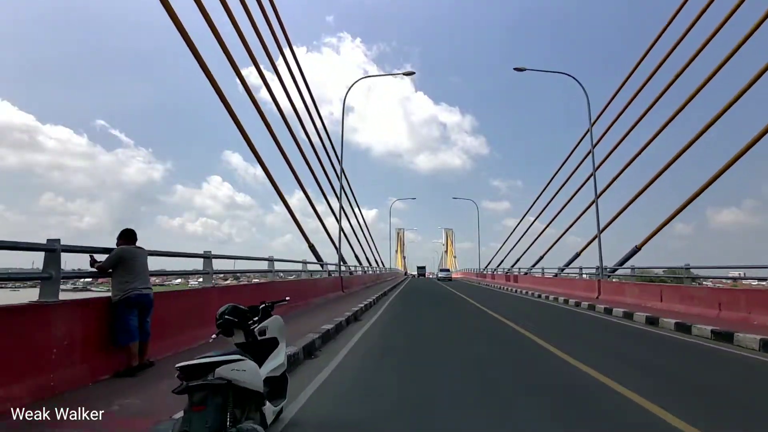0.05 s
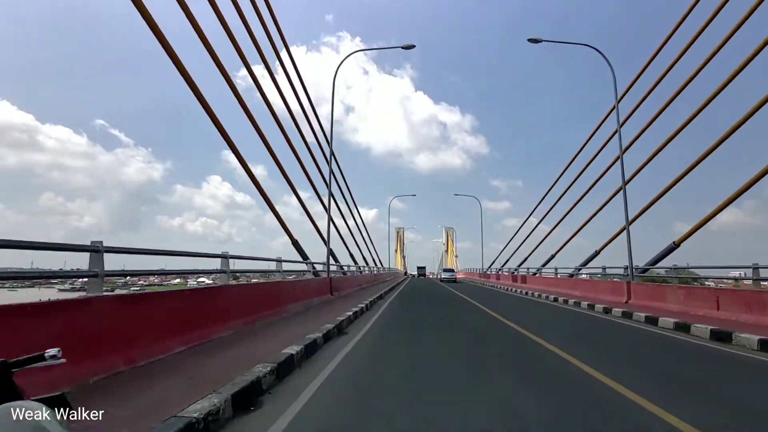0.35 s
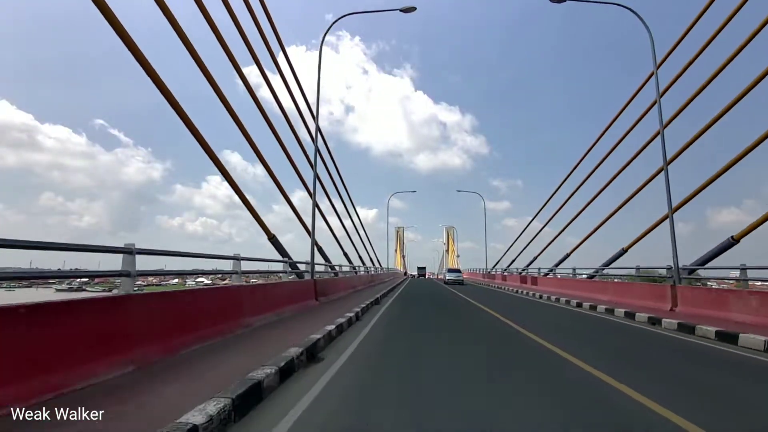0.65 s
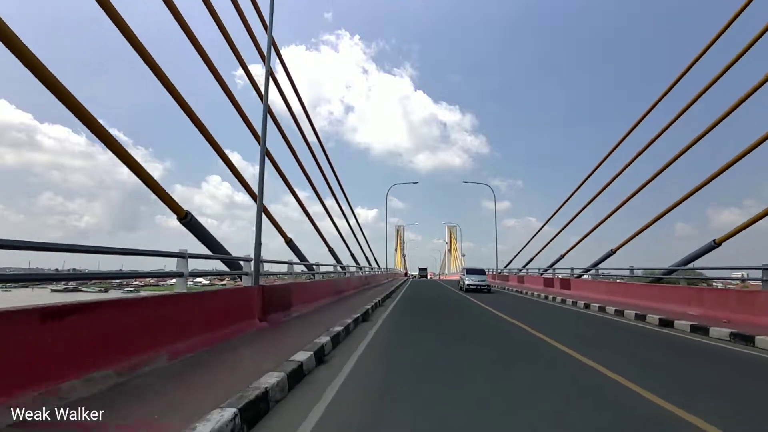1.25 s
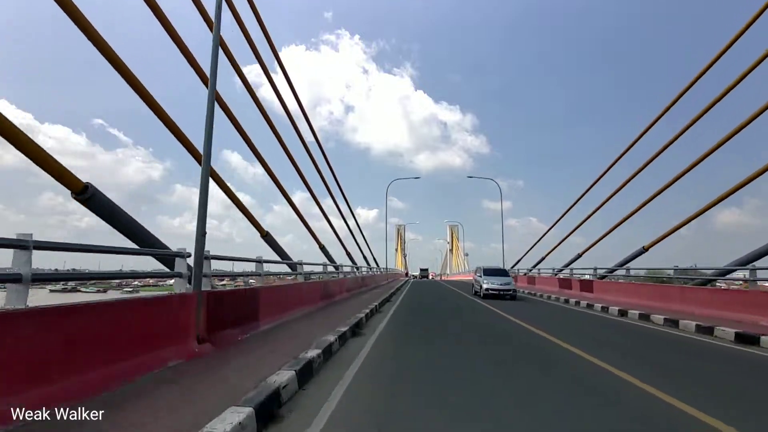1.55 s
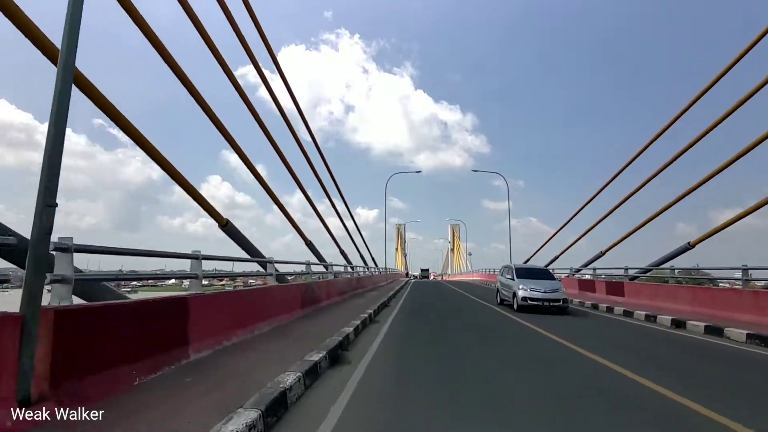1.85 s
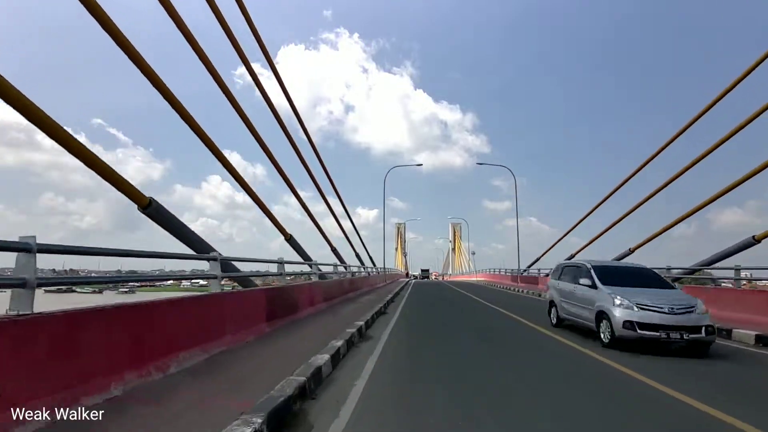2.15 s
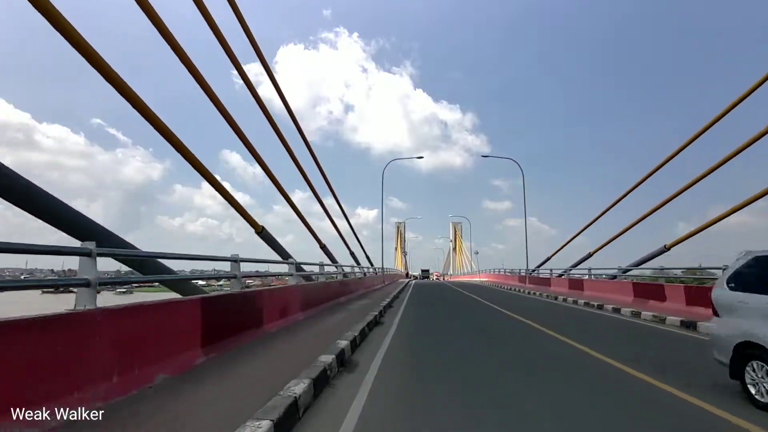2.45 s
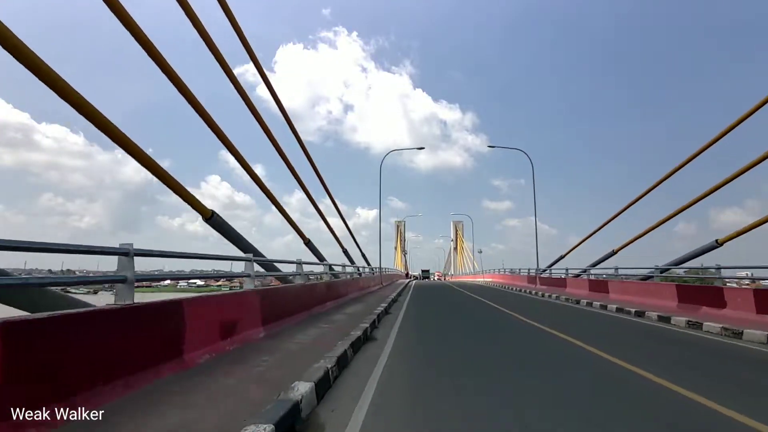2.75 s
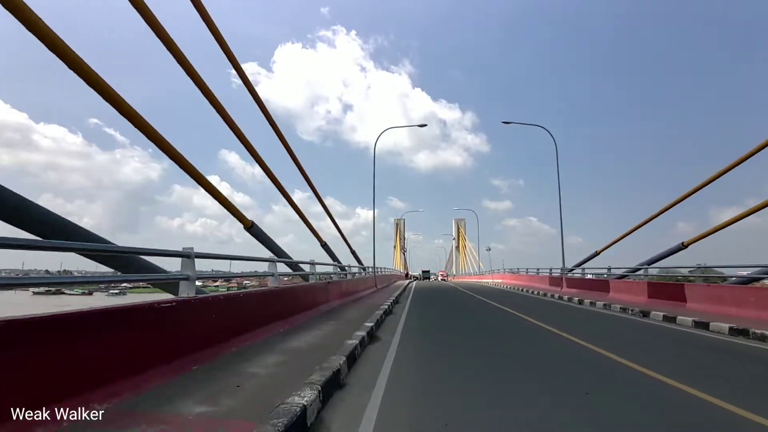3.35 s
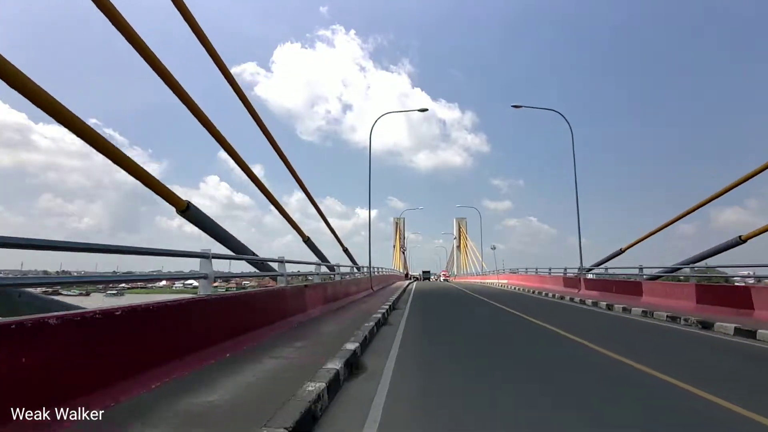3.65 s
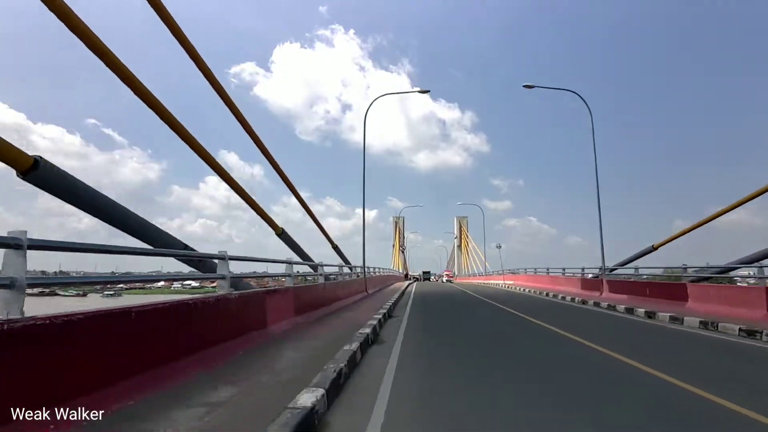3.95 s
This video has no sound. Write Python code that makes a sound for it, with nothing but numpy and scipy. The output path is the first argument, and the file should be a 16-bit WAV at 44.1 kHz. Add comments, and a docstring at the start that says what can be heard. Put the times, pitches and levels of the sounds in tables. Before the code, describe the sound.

Steady tyre roar and engine drone inside a car, with bumps and a faint rattle.

```python
"""Driving over a bridge

Inside the car, a four-cylinder engine drones and booms under the rumble and roar of the tyres.
A loose fitting ticks each time the engine fires, and now and then it rubs and squeaks.
The wheels thump over bumps, rough patches and a joint in the bridge deck."""
import sys
import numpy as np
from scipy import signal
from scipy.fft import rfft, irfft
from scipy.io import wavfile

SR = 44100
rng = np.random.default_rng(int(sys.argv[2]) if len(sys.argv) > 2 else 0)


def store_pcm(level_fs):
    """Save levels as 16-bit WAV."""
    pcm = np.round(np.clip(level_fs, -1, 1) * 32767).astype(np.int16)
    wavfile.write(sys.argv[1], SR, np.atleast_2d(pcm).T)


N = 176400
T = np.arange(N) / SR

# How fast the engine turns: time_s, speed_rpm
ENGINE_SPEED = [(0, 1950), (.7, 1950), (1.2, 1944), (1.7, 1950), (2.2, 1960), (3, 1954), (4, 1950)]
# The engine's low tones: cycles_per_turn, level_db, waver_db
DRONE_TONES = [(1, -51, 6), (2, -36, 1.5), (3, -39.5, 3.5), (5, -33.5, 1), (6, -42, 0), (8, -44, 2)]
# How loudly the cabin booms: time_s, level_db
BOOM_LEVEL = [(0, -27), (.25, -19), (.44, -26.5), (.54, -22.5), (.7, -28.5), (1.1, -27.5), (1.3, -28.5),
              (1.5, -24.5), (1.8, -33), (2.05, -26), (2.7, -28.5), (2.95, -25), (3.2, -32), (3.5, -28.5),
              (4, -35.5)]

# Colour (the mix of low and high sound) of the suspension's rumble: pitch_hz, gain_db
RUMBLE_COLOUR = [(10, -25), (22, -22), (35, -11), (50, -5.5), (75, -0.5), (110, 0.5), (150, -2.5),
                 (200, -1), (260, -7.5), (400, -25), (800, -70)]
# How loud the rumble is: time_s, level_db
RUMBLE_LEVEL = [(0, -26), (.3, -23), (.6, -23), (.8, -29), (1.0, -26), (1.2, -27), (1.65, -26.5),
                (1.9, -30.5), (2.25, -25), (2.6, -29), (2.9, -29), (3.15, -24), (3.4, -27.5), (4, -27)]
# Colour of the tyres' roar: pitch_hz, gain_db
ROAR_COLOUR = [(60, -56), (170, -12.5), (270, 1.5), (350, 1), (460, 0.5), (620, -2), (840, -2), (1000, -7),
               (1270, -13), (1550, -12), (1800, -12), (2100, -11), (2270, -17), (2480, -24.5),
               (2850, -25.5), (3150, -20.5), (3450, -21), (3800, -30.5), (4500, -31.5), (5300, -38.5),
               (6200, -42), (7400, -37.5), (8700, -46), (10500, -48), (12600, -46), (13800, -49),
               (16000, -53)]
# How loud the roar is: time_s, level_db
ROAR_LEVEL = [(0, -24.5), (.3, -26), (.6, -23.5), (.8, -26.6), (.98, -26.5), (1.35, -26), (1.62, -24.5),
              (1.85, -25), (2.3, -26), (2.55, -26), (2.75, -25.5), (3.1, -26), (3.45, -26.5), (3.8, -25.5),
              (4, -27)]
# The whine of the tyre tread: pitch_hz, width_hz, level_db
TREAD_WHINE = (1876, 39, -44.5)
# A hollow note in the tyre noise: pitch_hz, width_hz
HOLLOW_NOTE = (787, 143)
# How that note swells and fades: time_s, level_db
HOLLOW_LEVEL = [(0, -40), (1.3, -34.5), (1.7, -32.5), (2.2, -52), (2.6, -35), (2.76, -32), (3.1, -45),
                (3.42, -28.5), (3.6, -39.5), (3.78, -29), (4, -42)]

# Colour of the loose fitting's ticks: pitch_hz, gain_db
FITTING_COLOUR = [(1500, -12), (3000, -7), (4500, -2.5), (5300, -9), (6100, -9), (6700, 1.5), (7400, 4.5),
                  (8000, 2.5), (8700, -6), (9100, -1), (9500, -9.5), (10900, -5), (11200, -11.5),
                  (12100, -4.5), (12750, -2), (13300, -8), (13800, -13), (14400, -14), (15100, -16),
                  (17000, -20)]
# Its hardest knocks: start_s, level_db
KNOCKS = [(.1131, -38), (.192, -40), (.2672, -39), (0.2816, -38), (.39, -35), (0.4068, -32), (0.76, -35),
          (0.79, -37), (.821, -33), (1.052, -38), (1.222, -41), (1.269, -33), (1.299, -40), (1.3465, -36),
          (1.547, -36), (1.5773, -37), (1.6387, -35), (1.762, -35), (1.8225, -39), (1.8534, -35.5),
          (1.93, -38), (2.236, -40), (2.2523, -40), (2.3285, -37), (3.049, -38), (3.0814, -39),
          (3.3402, -36), (3.4325, -38), (3.465, -39), (3.496, -36), (3.68, -36), (3.8788, -35.5)]
# How hard it chatters: time_s, level_db
CHATTER_LEVEL = [(0, -41.5), (.35, -44), (.5, -40), (.58, -46), (.85, -39), (.89, -41), (.95, -43.5),
                 (1.12, -43.5), (1.3, -39), (1.38, -50), (1.43, -41), (1.72, -47), (2.05, -42.5),
                 (2.45, -43.5), (2.53, -44), (2.65, -43.5), (2.8, -45.5), (2.95, -42), (3.16, -41),
                 (3.2, -50), (3.3, -45), (3.48, -38), (3.62, -45), (3.76, -39), (3.82, -48), (3.9, -41),
                 (4, -46)]
# Its thin metallic ringing: pitch_hz, width_hz, offset_from_chatter_db, waver_db
METAL_RINGS = [(7450, 71, -27, 3), (14400, 130, -36, 3)]
# Its short, high squeaks: start_s, length_s, level_db, pitch_hz
SQUEAKS = [(.1, .018, -62, 14430), (.15, .025, -58, 14420), (.32, .03, -61, 14460),
           (.565, .025, -51, 14430), (.6, .025, -53, 14480), (.635, .06, -57, 14370),
           (.86, .025, -61, 14390), (1.255, .025, -62, 14400), (1.437, .025, -57, 14410),
           (2.3, .02, -62, 14390), (2.65, .025, -62, 14380), (2.765, .025, -62, 14440),
           (3.11, .025, -62, 14420), (3.43, .05, -61, 14380)]

# Wheels hitting bumps: start_s, peak_db, pitch_hz
THUMPS = [(.228, -15, 124), (.278, -16.5, 217), (0.352, -16, 170), (0.532, -8, 137), (1.098, -12.5, 115),
          (1.131, -12.5, 120), (1.161, -20, 230), (1.626, -11, 136), (3.135, -17.5, 109), (3.217, -14, 168)]
# Rough patches of deck: start_s, length_s, level_db, low_edge_hz, top_edge_hz
ROUGH_PATCHES = [(0.281, 0.032, -19, 210, 550), (0.345, .02, -20, 300, 1100),
                 (0.464, 0.066, -18.5, 380, 1500), (0.519, .17, -25.5, 400, 3000),
                 (0.594, .035, -26, 400, 2300), (1.056, 0.04, -15, 470, 1050),
                 (1.092, 0.085, -19, 230, 750), (1.129, 0.024, -19.5, 600, 1200),
                 (1.606, 0.038, -20, 210, 1200), (3.575, 0.037, -19, 280, 650)]
# Bursts of gritty hiss: start_s, length_s, level_db
GRIT_BURSTS = [(0.484, 0.034, -27.5), (0.517, 0.19, -38.5), (.643, 0.028, -33.5), (3.749, 0.022, -32)]
# Colour of that hiss: pitch_hz, gain_db
GRIT_COLOUR = [(1000, -14), (2100, 10), (2700, -2.5), (3400, 1.5), (4500, -10), (6000, -17), (9000, -28),
               (16000, -45)]
# The boom of a deck joint: length_s, peak_db, first_hz, last_hz
JOINT_BOOM = (.052, -15.5, 363, 241)
# An instant when the whole sound drops away: middle_s, half_length_s, depth_db
LEVEL_DIP = (.45, 0.0025, -24)


def amp(db):
    """Turns decibels into a number to multiply a sound by."""
    return 10 ** (np.asarray(db) / 20)


def unit(x):
    """Scales a signal so that its typical size (rms) is 1."""
    return x / np.sqrt(np.mean(x ** 2) + 1e-20)


def curve(points):
    """Joins (time_s, value) points with straight lines."""
    return np.interp(T, *np.transpose(points))


def spectrum(colour, hz):
    """Looks up how strong a colour table is at the pitch hz."""
    pitches, db = np.transpose(colour)
    return amp(np.interp(np.log(hz + 1), np.log(pitches), db))


def noise(shape):
    """Noise of typical size 1; shape(f) says how strong each frequency is."""
    white = rfft(rng.standard_normal(N))
    return unit(irfft(white * shape(np.fft.rfftfreq(N, 1 / SR)), N))


def waver(rate_hz):
    """A smooth random wobble, mostly slower than rate_hz."""
    return noise(lambda f: 1 / (1 + (f / rate_hz) ** 4))


def ring(hz, width_hz):
    """Noise gathered around one pitch, like something ringing."""
    return noise(lambda f: 1 / (1 + ((f - hz) / width_hz) ** 2))


def body(x, colour, size=2048):
    """Makes x ring like an object of this colour, using a filter that only rings after a hit."""
    log_gain = np.log(spectrum(colour, abs(np.fft.fftfreq(size, 1 / SR))))
    taps = np.fft.ifft(np.exp(np.conj(signal.hilbert(log_gain)))).real
    return signal.fftconvolve(x, taps / np.linalg.norm(taps))[:N]


def burst(start, length, rise_s=.016, fade_db=-8):
    """A loudness shape that rises quickly, fades over its length and then lets go."""
    age = np.maximum(T - start, 0)
    return np.minimum(age / rise_s, 1) * amp(fade_db * age / length) / (1 + (age / length) ** 8)


def add(mix, start_s, sound):
    """Adds a sound to the mix at start_s."""
    part = mix[max(round(start_s * SR), 0):][:len(sound)]
    part += sound[:len(part)]


def engine(turns):
    """The turning engine hums low tones; the one at four cycles a turn makes the cabin boom."""
    def tone(cycles_per_turn, db, waver_db):
        strength = np.sqrt(2) * amp(db + waver_db * waver(5.6))
        return strength * np.sin(2 * np.pi * (cycles_per_turn * turns + rng.random()))
    boom = tone(4, curve(BOOM_LEVEL), waver_db=-1)
    return boom + sum(tone(*row) for row in DRONE_TONES)


def tyres():
    """Rolling tyres rumble through the suspension, roar, whine and sound a hollow note."""
    rumble = noise(lambda f: spectrum(RUMBLE_COLOUR, f)) * amp(curve(RUMBLE_LEVEL))
    roar = noise(lambda f: spectrum(ROAR_COLOUR, f)) * amp(curve(ROAR_LEVEL) + .95 * waver(50))
    hz, width_hz, db = TREAD_WHINE
    whine = amp(db) * ring(hz, width_hz)
    hollow = amp(curve(HOLLOW_LEVEL)) * ring(*HOLLOW_NOTE)
    return rumble + roar + whine + hollow


def tick(rise_s=.00084, decay_s=.0016, tail_s=.0047, tail_db=-15):
    """One tap of the loose fitting: a tiny burst of noise, sometimes duller, sometimes brighter."""
    t = np.arange(0, .02, 1 / SR)
    fade = np.exp(-t / decay_s) + amp(tail_db) * np.exp(-t / tail_s)
    brightness = .36 * rng.uniform(-1.05, 1)
    hiss = signal.lfilter([1, -brightness], [np.hypot(1, brightness)], rng.standard_normal(len(t)))
    return np.minimum(t / rise_s, 1) * fade * hiss


def rattle(turns, lag_s=.0062, jitter_s=.00065, spread_db=3.8,
           bounce_chance=.57, bounce_s=.006, bounce_db=-2.5):
    """The engine fires twice a turn and shakes the fitting, which ticks, rings and may bounce."""
    taps, chatter_db = np.zeros(N), curve(CHATTER_LEVEL)
    for start, db in KNOCKS:
        add(taps, start, amp(db) * tick())
    firings = np.flatnonzero(np.diff(np.floor(2 * turns), prepend=-1))
    for at in firings:
        # Each tick and bounce is a little uneven in strength and timing.
        force, timing, bounce_force, bounce_timing = np.clip(rng.standard_normal(4), -2, 1.6)
        start = T[at] + lag_s + jitter_s * timing
        bounces = rng.random() < bounce_chance
        add(taps, start, amp(chatter_db[at] + spread_db * force) * tick())
        bounce = amp(chatter_db[at] + bounce_db + spread_db * bounce_force) * tick()
        add(taps, start + bounce_s * (1 + .43 * bounce_timing), bounces * bounce)
    ringing = sum(ring(hz, width_hz) * amp(chatter_db + offset_db + waver_db * waver(17))
                  for hz, width_hz, offset_db, waver_db in METAL_RINGS)
    return body(taps, FITTING_COLOUR) + ringing


def squeaks(waver_hz=90):
    """The shaken fitting rubs now and then, making short chirps of unsteady pitch and grip."""
    drift_hz = waver_hz * waver(120)
    grip = unit(amp(3 * waver(70)))
    chirps = np.zeros(N)
    for start, length, db, hz in SQUEAKS:
        cycles = np.cumsum(hz + drift_hz) / SR
        chirps += amp(db) * burst(start, length) * np.sqrt(2) * np.sin(2 * np.pi * cycles)
    return grip * chirps


def wheel_thumps(rise_s=.0046, decay_s=.01):
    """A wheel hitting a bump makes a low note that dies away at once."""
    out, t = np.zeros(N), np.arange(0, .1, 1 / SR)
    swell = (1 - np.exp(-(t / rise_s) ** 2)) * np.exp(-t / decay_s)
    for start, db, hz in THUMPS:
        add(out, start, amp(db) * swell / swell.max() * np.sin(2 * np.pi * hz * t))
    return out


def rough_patches():
    """Rough bits of deck make the tyres roar louder for a moment and add a gritty hiss."""
    roar = np.zeros(N)
    for start, length, db, low_hz, top_hz in ROUGH_PATCHES:
        def band(f):
            return np.minimum(f / low_hz, 1) ** 2 / np.sqrt(1 + (f / top_hz) ** 4)
        roar += amp(db) * burst(start, length) * noise(lambda f: spectrum(ROAR_COLOUR, f) * band(f))
    grit = noise(lambda f: spectrum(GRIT_COLOUR, f))
    return roar + grit * sum(amp(db) * burst(start, length) for start, length, db in GRIT_BURSTS)


def deck_joint(start_s=1.046):
    """Crossing a joint in the deck makes one short boom that falls in pitch."""
    out, t = np.zeros(N), np.arange(0, .1, 1 / SR)
    length, db, first_hz, last_hz = JOINT_BOOM
    progress = np.minimum(t / length, 1)
    cycles = np.cumsum(first_hz + (last_hz - first_hz) * progress) / SR
    add(out, start_s, amp(db) * np.sin(np.pi * progress) * np.sin(2 * np.pi * cycles))
    return out


def scene():
    """Everything heard in the cabin, mixed into one channel."""
    turns = np.cumsum(curve(ENGINE_SPEED)) / 60 / SR  # engine turns so far
    cruising = engine(turns) + tyres()
    bumps = wheel_thumps() + rough_patches() + deck_joint()
    fitting = rattle(turns) + squeaks()
    return (cruising + bumps + fitting)[None]


def record(dry, top_hz=15650):
    """The level dips once, very briefly, and the highest treble is cut away."""
    middle_s, half_length_s, depth_db = LEVEL_DIP
    dipped = dry * amp(depth_db / (1 + ((T - middle_s) / half_length_s) ** 16))
    treble_cut = signal.firwin(401, top_hz, window=("kaiser", 9), fs=SR)
    return signal.oaconvolve(dipped, treble_cut[None], "same")


dry = scene()
out = record(dry)
store_pcm(out)
```